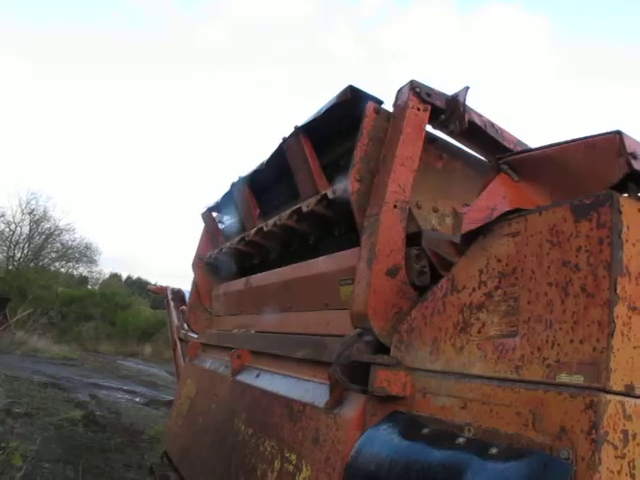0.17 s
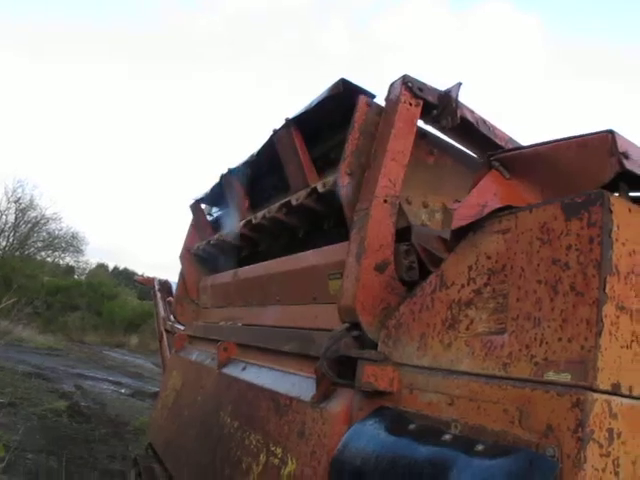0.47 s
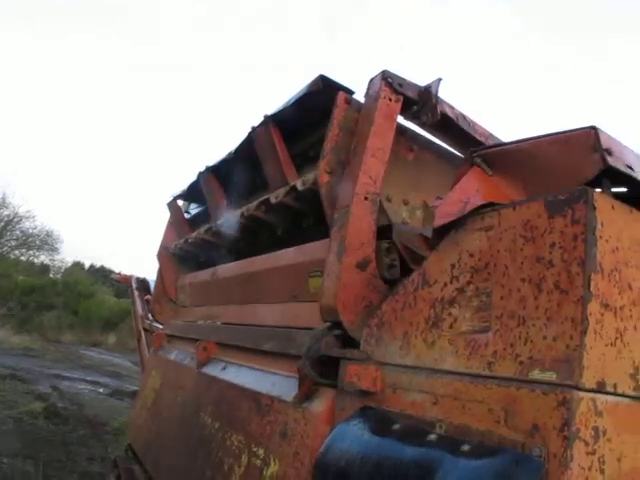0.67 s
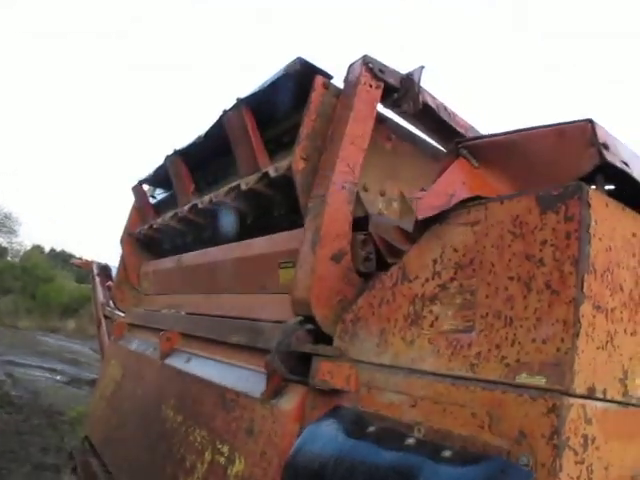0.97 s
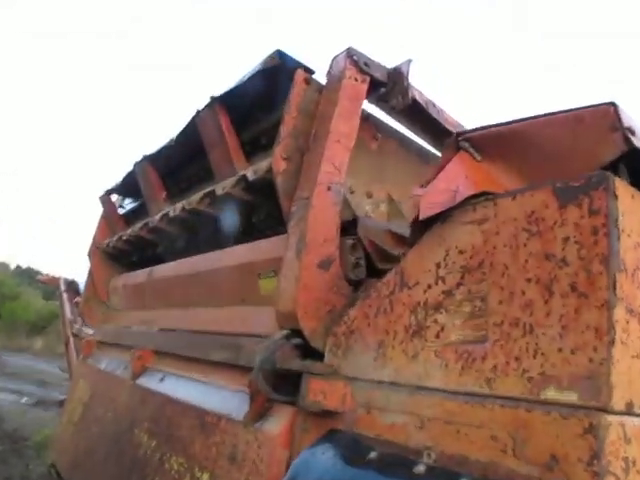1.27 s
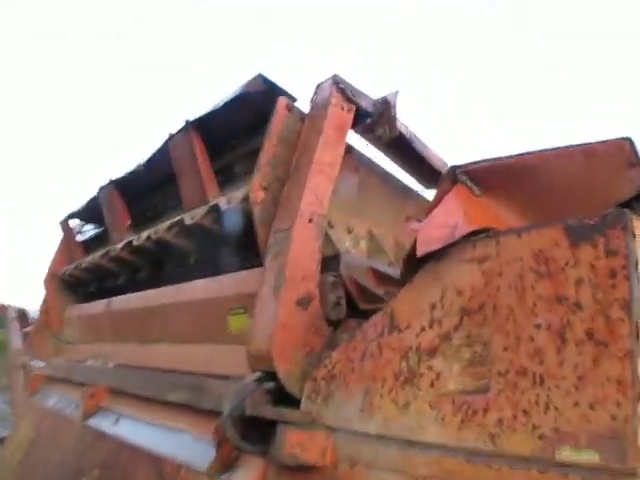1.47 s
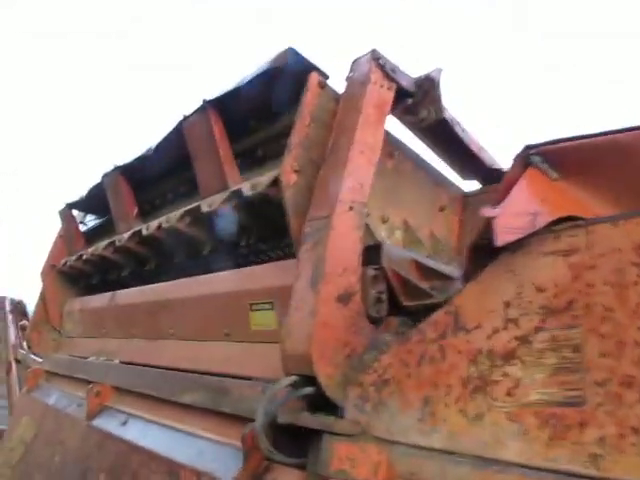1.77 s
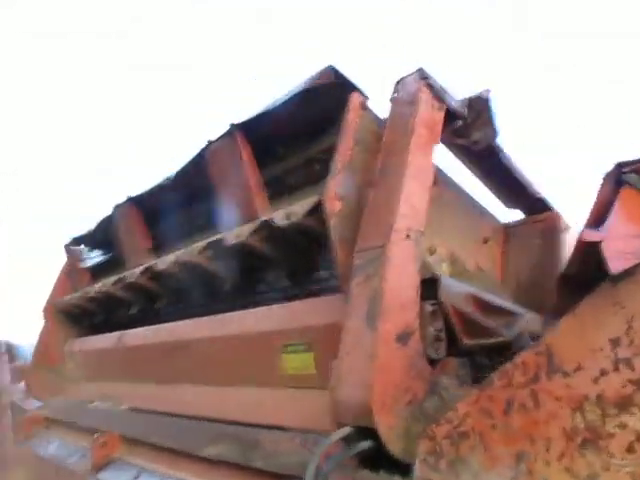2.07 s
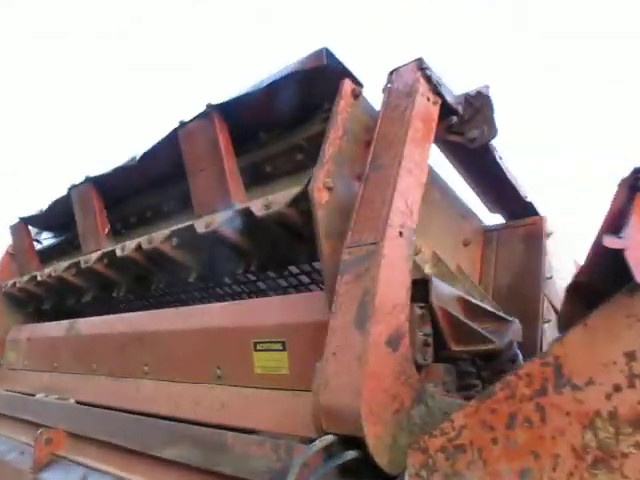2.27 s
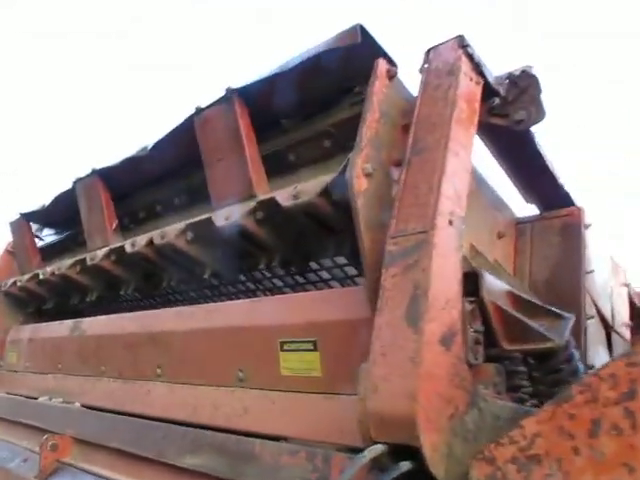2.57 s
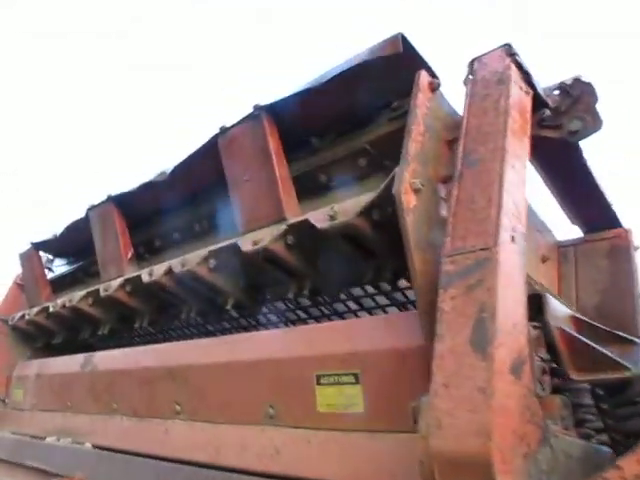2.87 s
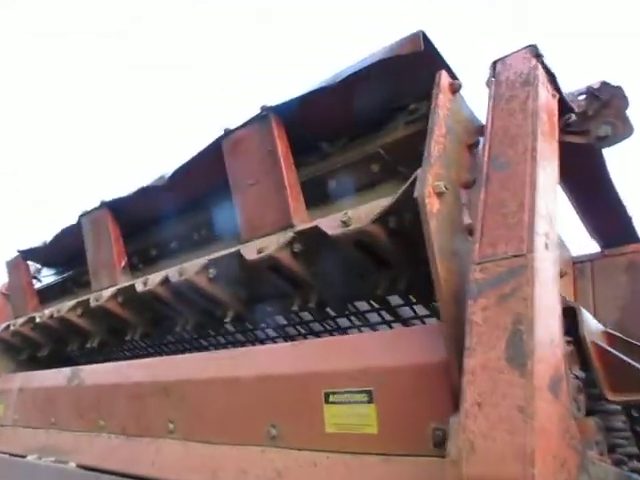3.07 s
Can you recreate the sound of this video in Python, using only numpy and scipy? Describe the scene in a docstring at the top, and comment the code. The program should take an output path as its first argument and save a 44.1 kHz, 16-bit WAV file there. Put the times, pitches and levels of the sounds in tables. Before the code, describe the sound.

A diesel screening machine throbs and clatters, its steel mesh rattling as it comes closer.

```python
"""The sound cuts in slightly loud and settles: a diesel engine already running, throbbing and clattering.
It drives a mobile screening plant; its firings sound a harmonic series in the exhaust and force steel
panels into resonance. As the listener walks closer, the screen box, shaking about 14 times a second,
hums and booms, and impacts rattle its wire mesh and cross bars with every stroke. Loose bits tinkle,
and close up, friction makes a dry steel joint squeak and ring."""
import sys
import numpy as np
from scipy import signal
from scipy.fft import rfft, irfft, next_fast_len
from scipy.io import wavfile
from scipy.ndimage import map_coordinates

SR = 44100
rng = np.random.default_rng(int(sys.argv[2]) if len(sys.argv) > 2 else 0)


def to_wav(s):
    """Save 16-bit WAV."""
    ch = np.atleast_2d(s).T  # columns
    pcm = np.round(np.clip(ch, -1, 1) * 32767)  # PCM
    wavfile.write(sys.argv[1], SR, pcm.astype(np.int16))


N = 142002
T = np.arange(N) / SR
SHAKE_HZ = 14.2
STROKES = SHAKE_HZ * T


def amp(db):
    """Amplitude ratio of a level in decibels."""
    return 10 ** (np.asarray(db) / 20)


def unit(x):
    """Normalisation to rms 1."""
    return x / np.sqrt(np.mean(x ** 2) + 1e-20)


def curves(rows):
    """Linear interpolation: one value per sample for each column after the time."""
    times, *columns = np.transpose(rows)
    return [np.interp(T, times, column) for column in columns]


def wobble(knots_per_s):
    """Random modulation: a smooth curve through Gaussian values."""
    return map_coordinates(rng.standard_normal(1024), [T * knots_per_s + 3], mode="wrap")


def lobe(cycles, at, sharpness):
    """Periodic modulation: one smooth bump a cycle, peaking at the fraction `at`."""
    return np.exp(sharpness * (np.cos(2 * np.pi * (cycles - at)) - 1))


def filtered(x, response):
    """Linear filtering: the spectrum of x times a frequency response."""
    size = next_fast_len(N + SR // 2)
    return irfft(rfft(x, size) * response(np.fft.rfftfreq(size, 1 / SR)), size)[:N]


def coloured(x, spectrum):
    """Spectral shaping of x by (Hz, dB) points, at rms 1."""
    hz, db = np.transpose(spectrum)
    return unit(filtered(x, lambda f: amp(np.interp(np.log(f + 1), np.log(hz), db))))


def resonances(f, modes):
    """Modal superposition: the summed response of damped (Hz, bandwidth Hz, dB) resonators."""
    return sum(amp(db) * 1j * f * width / (hz * hz - f * f + 1j * f * width) for hz, width, db in modes)


def impacts(per_s, spread_db):
    """A Poisson process: independent contacts of uneven size."""
    signs = (rng.random(N) < per_s / SR) * rng.choice([-1, 1], N)
    return signs * amp(spread_db * np.clip(rng.standard_normal(N), -2, 2))


def scattered(per_s, size, t60, tail_db, places=8):
    """Convolution: contacts at several places each excite that place's own short, dense ring."""
    t, out = np.arange(SR // 10) / SR, np.zeros(N)
    for _ in range(places):
        hits = impacts(per_s / places, spread_db=1.5) * size
        tail = rng.standard_normal(len(t)) * amp(-60 * t / t60)
        out += hits + amp(tail_db) * signal.fftconvolve(hits, tail / np.linalg.norm(tail))[:N]
    return unit(out)


def grit(near, level_db=-44, centre_hz=3300, width_octaves=.75):
    """Tiny impacts of loose parts make a gritty ticking that fades as the screen nears."""
    ticks = scattered(per_s=260, size=1, t60=.012, tail_db=3)
    band = lambda f: np.exp(-(np.log2((f + 1) / centre_hz) / width_octaves) ** 2)
    return amp(level_db) * (1 - near) * unit(filtered(ticks, band))


# Clear tinkles of loose steel. Each row: start in seconds, frequency in Hz, relative level in dB.
TINKLES = [(.455, 7300, -33), (.465, 8900, -37), (.61, 8802, -38), (1.12, 8802, -39), (1.325, 9921, -41),
           (1.485, 8802, -42), (1.78, 9921, -48), (1.915, 8850, -35), (2.125, 9800, -37),
           (2.697, 8802, -37), (3.163, 8802, -35)]

def tinkles(level_db=-2, faint_db=-47, spread_db=2.5, t60=.097, range_hz=(6800, 10200), count=30):
    """Free vibration: small loose bits ring as damped sinusoids, a few clearly, many faintly."""
    t, out = np.arange(SR // 8) / SR, np.zeros(N + SR)
    faint = [(rng.random() * N / SR, rng.uniform(*range_hz), faint_db + rng.normal(0, spread_db))
             for _ in range(count)]
    for start, hz, db in TINKLES + faint:
        ring = np.sin(2 * np.pi * hz * t) * (1 - np.exp(-t / .0016))
        out[round(start * SR):][:len(t)] += amp(level_db + db - 60 * t / t60) * ring
    return out[:N]


# Engine speed. Each row: time in seconds, working cycles per second (four firings in each).
ENGINE_SPEED = [(0, 16.635), (.95, 16.68), (1.08, 16.49), (1.22, 16.29), (1.45, 16.43), (1.7, 16.465),
                (2.3, 16.46), (3.2, 16.465)]

def engine_cycles(first_beat_s=.05):
    """Phase is the integral of frequency: working cycles counted from the first strong beat."""
    return np.cumsum(curves(ENGINE_SPEED)[0]) / SR - first_beat_s * ENGINE_SPEED[0][1]


# Modes of the steel panels. Each row: frequency in Hz, bandwidth in Hz, relative level in dB.
PANEL_MODES = [(415, 21, -12), (478, 9.3, -3), (835, 30, 3), (935, 30, -.5), (1640, 21, -27),
               (1918, 46, -11), (2490, 38, -17), (2890, 26, -16)]

def panels(cycles, near, level_db=-34.3, near_db=2, knock=.17, cutoff_hz=4000):
    """Forced vibration: the firings knock the steel panels into their resonances."""
    drive = impacts(2500, spread_db=4) * (1 + knock * lobe(4 * cycles, 0, 1.2))
    body = lambda f: resonances(f, PANEL_MODES) / (1 + (f / cutoff_hz) ** 4)
    return amp(level_db + near_db * near) * unit(filtered(drive, body))


# Spectrum of the combustion noise. Each row: frequency in Hz, relative level in dB.
ROAR_SPECTRUM = [(20, -21), (31, -11), (42, -20), (85, -7.5), (130, 0), (200, 1.5), (310, -3.5),
                 (450, -1.5), (580, -5), (800, -5), (1200, -14), (2500, -19.5), (6000, -52), (12000, -100)]

def roar(cycles, near, level_db=-28, near_db=1, first_puff=.58, second_puff=.47):
    """Amplitude modulation: low combustion noise puffs twice a cycle, between the strong beats."""
    puffs = 1 + first_puff * lobe(cycles, .3, 4.9) + second_puff * lobe(cycles, .774, 3.7)
    return amp(level_db + near_db * near) * coloured(puffs * rng.standard_normal(N), ROAR_SPECTRUM)


# Exhaust tone. Each row: multiple of the cycle rate, relative level in dB afar, and beside the screen.
EXHAUST_HARMONICS = [(1, -13.5, -24), (2, -20, -22), (3, -31, -24), (4, 3, 0), (6, -22.5, -13), (8, 3, 1.5),
                     (9, -8, -2), (10, 0, 0.5), (11, -7.5, -15), (12, -21, -18), (13, -35, -16.5),
                     (14, -11, -28), (15, -7.5, -14), (16, -22, -20), (17, -21, -23), (18, -13.5, -14),
                     (19, -24, -16), (20, -18, -17), (21, -18, -30), (22, -26, -23.5), (23, -22, -23),
                     (24, -17.5, -25), (26, -22, -17), (27, -28, -14), (28, -22, -16)]
# Strength of the exhaust. Each row: time in seconds, level in dB.
EXHAUST_LEVEL = [(0.16, -23.5), (0.7, -22), (1.2, -21.5), (1.65, -21), (2.15, -23), (2.7, -22.5),
                 (3.2, -24)]

def exhaust(cycles, near, pipe_hz=144, pipe_width_hz=108, jitter_cycles=.003, waver_db=.8):
    """Periodic excitation: uneven firings drive the pipe at wavering harmonics of the cycle rate."""
    cycles = cycles + jitter_cycles * wobble(25.1)
    tone = np.zeros(N)
    for k, far_db, near_db in EXHAUST_HARMONICS:
        pipe_lag = np.arctan(2 * (k * ENGINE_SPEED[0][1] - pipe_hz) / pipe_width_hz)
        db = far_db + near * (near_db - far_db) + waver_db * wobble(12)
        tone -= amp(db) * np.sin(2 * np.pi * k * cycles - pipe_lag)
    return amp(curves(EXHAUST_LEVEL)[0]) * unit(tone)


# Strength of the rattling. Each row: time in seconds, base level in dB of the clatter, and of the mesh.
RATTLE_LEVELS = [(0.16, -27.5, -38), (0.9, -26.5, -37.5), (1.5, -30, -42), (2.1, -28, -42), (2.7, -30, -43),
                 (3.2, -27.5, -40.5)]
# Spectrum of the clatter. Each row: frequency in Hz, relative level in dB.
CLATTER_SPECTRUM = [(300, -9.5), (700, -6), (1250, -3), (1950, -4), (2500, -5), (3200, -7.5), (4200, -15.5),
                    (6500, -24.5), (10000, -32), (14000, -62)]

def clatter(near, stroke_db=3.5, uneven_db=.2, hollow_db=-11, hollow_hz=1900, hollow_width_hz=220):
    """Impact noise of engine and ironwork; close up it surges each stroke and the box rings hollow."""
    surge_db = stroke_db * near * lobe(STROKES, .53, 1) + uneven_db * wobble(35.7)
    hits = scattered(per_s=3400, size=amp(surge_db), t60=.02, tail_db=3, places=12)
    hollow = unit(filtered(hits, lambda f: np.exp(-((f - hollow_hz) / hollow_width_hz) ** 2)))
    rattle = coloured(hits, CLATTER_SPECTRUM) + amp(hollow_db) * near ** 2 * hollow
    return amp(curves(RATTLE_LEVELS)[0]) * rattle


def screen_box(near, level_db=-34, near_db=7):
    """Piston radiation: the shaking box pumps the air at its stroke rate and first overtones."""
    harmonics = [(1, 5.0), (2, -16), (3, -4.5), (4, -5.5)]  # multiple, relative dB
    push = sum(amp(db) * np.cos(2 * np.pi * k * (STROKES - .15)) for k, db in harmonics)
    return amp(level_db + near_db * near) * unit(push)


# Spectrum of the booming box. Each row: frequency in Hz, relative level in dB.
BOOM_SPECTRUM = [(120, -22), (190, 13), (250, 3), (310, 14), (420, -19), (900, -57.5)]

def boom(near, level_db=-35):
    """Resonance of the hollow box: low noise swells with each stroke, heard close up."""
    drive = rng.standard_normal(N) * (.5 + lobe(STROKES, .44, .6))
    return amp(level_db) * near * coloured(drive, BOOM_SPECTRUM)


# Spectrum of the ringing cross bars. Each row: frequency in Hz, relative level in dB.
BAR_SPECTRUM = [(2300, -27), (3000, -2), (3500, 3), (4700, -1), (6000, -20), (9000, -50)]

def cross_bars(near, level_db=-44, stroke_db=5, t60=.033):
    """Impact excitation: just after the mesh, the bars under it are shaken into a bright ring."""
    surge_db = stroke_db * lobe(STROKES, .32, 2.2)
    hits = scattered(per_s=900, size=amp(surge_db), t60=t60, tail_db=13)
    return amp(level_db) * np.sqrt(near) * coloured(hits, BAR_SPECTRUM)


# Modes of the cross bars. Each row: frequency in Hz, bandwidth in Hz, relative level in dB.
BAR_MODES = [(940, 70, -2), (1320, 130, -3), (1900, 160, 2), (2330, 130, 7), (2837, 140, 8),
             (3190, 160, -3), (3420, 180, -3), (3720, 180, -3), (4366, 180, 1), (4900, 260, -1)]
# Clanks of the cross bars. Each row: start in seconds, relative level in dB.
CLANKS = [(1.358, -32.5), (1.648, -35), (1.785, -27), (1.847, -33.5), (1.864, -35.5), (1.924, -32.5),
          (2.008, -27.5), (2.061, -32), (2.082, -28), (2.13, -32), (2.209, -32.5), (2.34, -26),
          (2.414, -29.5), (2.483, -33), (2.509, -28.5), (2.558, -35), (2.693, -28.5), (2.708, -29),
          (2.833, -25), (2.888, -30), (2.913, -27), (3.042, -32.5), (3.074, -36), (3.109, -37),
          (3.186, -31.5)]

def clanks(level_db=-1, chatter_s=.009, attack_s=.0012, mode_spread_db=2, cutoff_hz=5400):
    """Transient response: each burst of contacts rings the bars with a new balance of modes."""
    t, out = np.arange(SR // 8) / SR, np.zeros(N + SR)
    f = np.fft.rfftfreq(len(t), 1 / SR)
    for start, db in CLANKS:
        envelope = (1 - np.exp(-t / attack_s)) * np.exp(-t / chatter_s)
        contacts = impacts(2200, spread_db=3)[:len(t)] * envelope
        modes = [(hz, width, level + rng.normal(0, mode_spread_db)) for hz, width, level in BAR_MODES]
        ring = irfft(rfft(contacts) * resonances(f, modes) / (1 + (f / cutoff_hz) ** 6), len(t))
        out[round(start * SR):][:len(t)] += amp(db + level_db) * ring / ring[:len(t) // 8].std()
    return out[:N]


# Spectrum of the wire mesh. Each row: frequency in Hz, relative level in dB.
MESH_SPECTRUM = [(1200, -1), (3000, -4), (4000, -3.5), (5500, -1.5), (7000, -4.5), (9000, -7), (10500, -11),
                 (12000, -17.5), (13500, -27), (15500, -37)]
# Clacks of the mesh. Each row: start in seconds, level in dB relative to its chatter.
CLACKS = [(1.737, 8), (1.846, 3.5), (1.921, 1), (2.058, 6), (2.128, 7.5), (2.268, 8), (2.336, 6),
          (2.404, 7), (2.478, 3), (2.553, 3), (2.654, 6), (2.692, 3), (2.755, 0), (2.823, 0), (2.968, 4),
          (3.035, 10), (3.106, -2), (3.185, -2)]

def mesh(near, level_db=1, throw_db=7.5, return_db=4, clack_s=.015):
    """Modulated impact noise: the mesh chatters hard once a stroke, more softly on the way back."""
    surge_db = throw_db * lobe(STROKES, .23, 4.7) + return_db * lobe(STROKES, .87, 9)
    clack_db = sum(db * (T > start) * np.exp(-np.abs(T - start) / clack_s) for start, db in CLACKS)
    hits = scattered(per_s=3500, size=amp(near * surge_db + clack_db), t60=.024, tail_db=6)
    return amp(curves(RATTLE_LEVELS)[1] + level_db) * coloured(hits, MESH_SPECTRUM)


def wires(level_db=-51, bounce_s=.0098, t60=.03, spread_db=3, range_hz=(6200, 10900), count=10):
    """Free vibration: each clack sets a handful of wires bouncing and ringing at their own pitches."""
    t, out = np.arange(SR // 10) / SR, np.zeros(N + SR)
    for start, db in CLACKS:
        for _ in range(count):
            ring = np.sin(2 * np.pi * rng.uniform(*range_hz) * t) * amp(-60 * t / t60)
            onset = round((start + bounce_s * rng.exponential()) * SR)
            out[onset:][:len(t)] += amp(level_db + db + rng.normal(0, spread_db)) * ring
    return out[:N]


# Modes of the dry steel joint, the main one first. Each row: frequency in Hz, relative level in dB.
JOINT_MODES = [(5943, 0), (5233, -22), (7725, -23), (8802, -30), (9921, -15), (11095, -29), (14244, -37)]

def joint_scrape(near, level_db=-53, width_hz=55, uneven_db=3.5):
    """Friction noise: the dry joint keeps scraping softly on its main mode."""
    main_mode = lambda f: 1 / (1 + ((f - JOINT_MODES[0][0]) / width_hz) ** 2)
    scrape = unit(filtered(rng.standard_normal(N), main_mode))
    return amp(level_db + uneven_db * wobble(11)) * near * scrape


# Squeaks of the joint. Each row: start in seconds, length in seconds, level in dB, pitch in Hz,
# roughness from 0 to 1, gain of the other modes in dB.
SQUEAKS = [(1.58, .06, -46, 5943, .6, 0), (1.862, .01, -37, 5943, .4, -6), (1.99, .085, -41, 5943, .7, -6),
           (2.081, .012, -28, 5965, 1, -12), (2.14, .02, -43, 5943, .6, -6),
           (2.208, .025, -40, 5943, .6, -6), (2.595, .008, -36, 5943, .4, 0),
           (2.692, .014, -28, 5950, .4, -10), (2.708, .025, -36, 5943, .3, -8),
           (2.919, .008, -30.5, 5925, .5, -8), (2.93, .035, -39, 5943, .25, -4),
           (3.044, .095, -34.5, 5940, .15, -7), (3.135, .012, -35, 5960, .25, -6),
           (3.184, .017, -21, 5935, .12, 0), (3.204, .03, -31, 5930, .12, -7)]

def joint_squeaks(wander_hz=110, attack_s=.0042, t60=.028):
    """Friction-induced vibration of the joint: the rougher the rub, the more pitch and level flutter."""
    t, out = np.arange(SR // 5) / SR, np.zeros(N + SR)
    for start, length, db, pitch, roughness, others_db in SQUEAKS:
        envelope = (1 - np.exp(-t / attack_s)) * amp(db - 60 * np.maximum(t - length, 0) / t60)
        main_hz = pitch + roughness * wander_hz * wobble(400)[:len(t)]
        clock = np.cumsum(main_hz) / SR / JOINT_MODES[0][0]  # all modes bend together
        flutter = 1 + .5 * roughness * wobble(262)[:len(t)]
        for k, (hz, mode_db) in enumerate(JOINT_MODES):
            gain = amp(mode_db + (k > 0) * others_db)
            tone = np.sin(2 * np.pi * (hz * clock + rng.random()))
            out[round(start * SR):][:len(t)] += gain * envelope * flutter * tone
    return out[:N]


# The walk towards the screen. Each row: time in seconds, nearness from 0 to 1.
NEARNESS = [(0, 0.1), (1.2, 0.43), (1.7, 0.62), (2.1, 0.53), (2.7, 1), (3.2, 0.94)]

def scene():
    """Superposition: engine and screen add in one channel, their balance shifting with nearness."""
    cycles, near = engine_cycles(), curves(NEARNESS)[0]
    engine = exhaust(cycles, near) + roar(cycles, near) + panels(cycles, near)
    box = screen_box(near) + boom(near)
    rattle = clatter(near) + mesh(near) + wires() + cross_bars(near) + clanks()
    return (engine + box + rattle + grit(near) + tinkles() + joint_squeaks() + joint_scrape(near))[None]


def record(dry, start_s=.0722, rise_s=.00021, overshoot_db=7, settle_s=.051, top_hz=15700):
    """Gating and band limiting: the sound cuts in loud, settles, and has nothing above top_hz."""
    age = np.maximum(T - start_s, 0)
    gain = np.clip(age / rise_s, 0, 1) * amp(overshoot_db * np.exp(-age / settle_s))
    return filtered(dry[0] * gain, lambda f: f < top_hz)[None]


dry = scene()
out = record(dry)
to_wav(out)
```